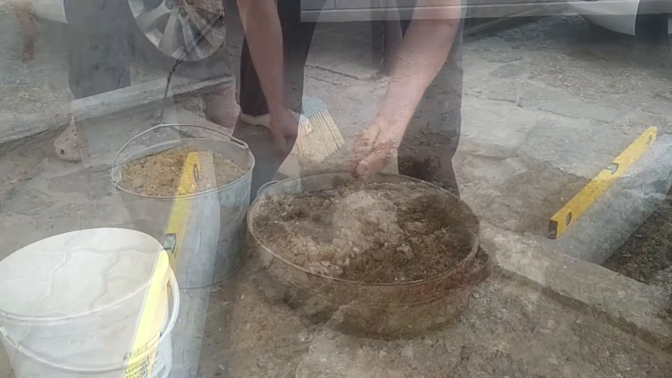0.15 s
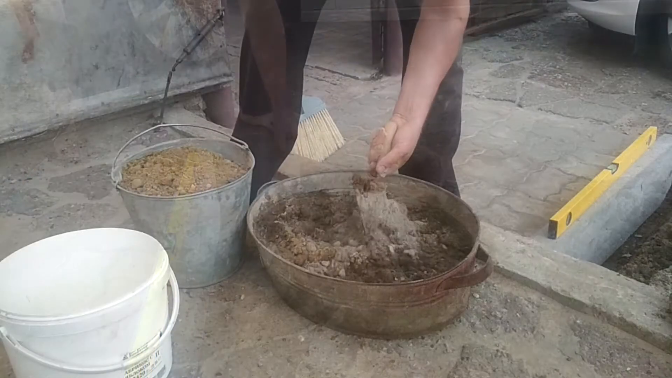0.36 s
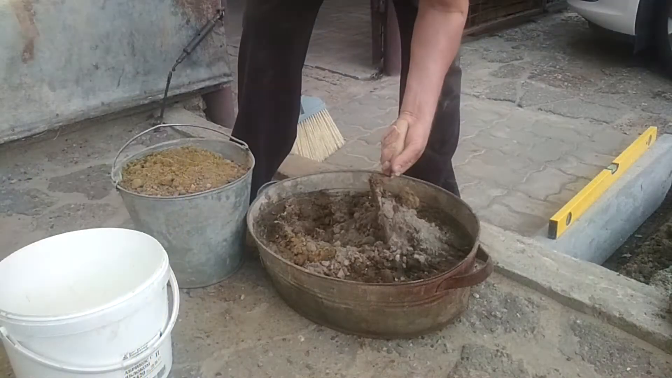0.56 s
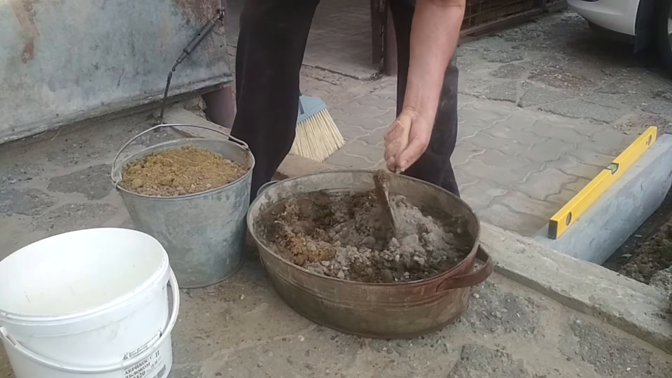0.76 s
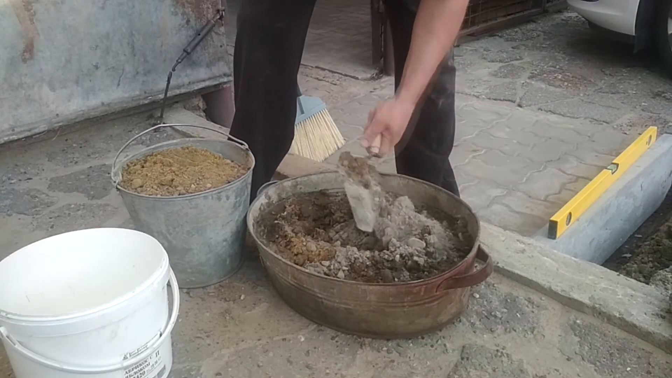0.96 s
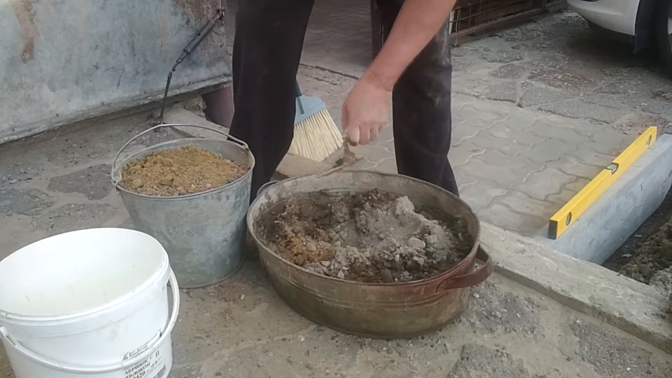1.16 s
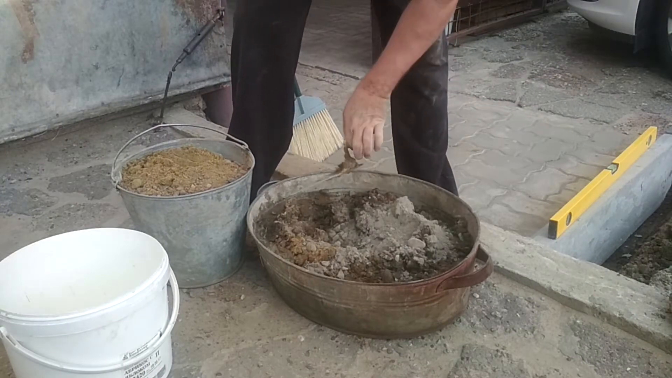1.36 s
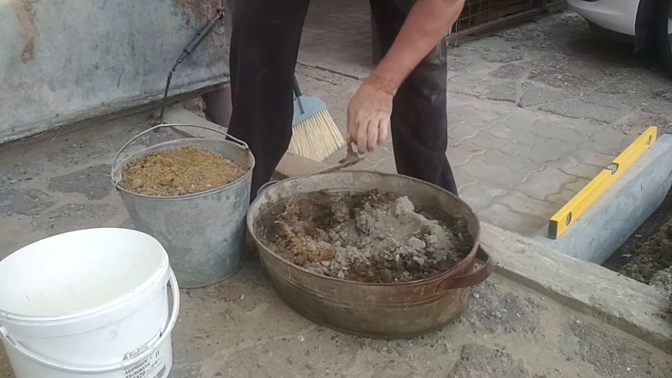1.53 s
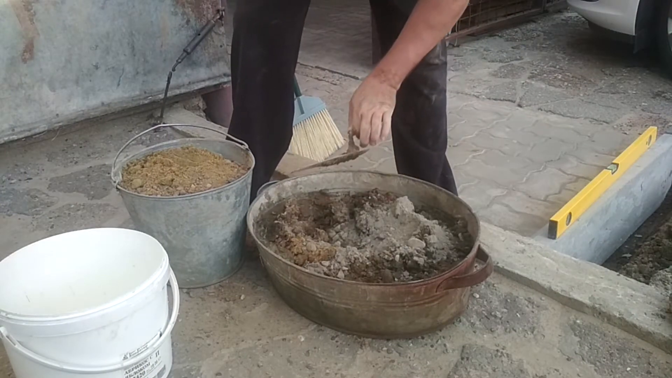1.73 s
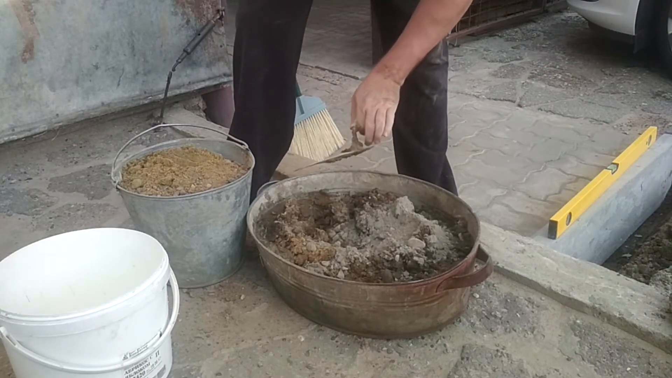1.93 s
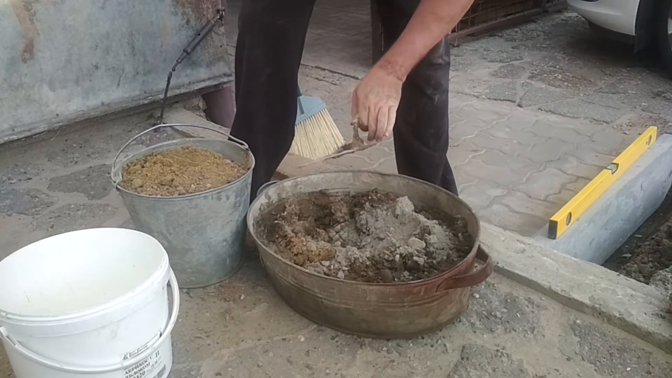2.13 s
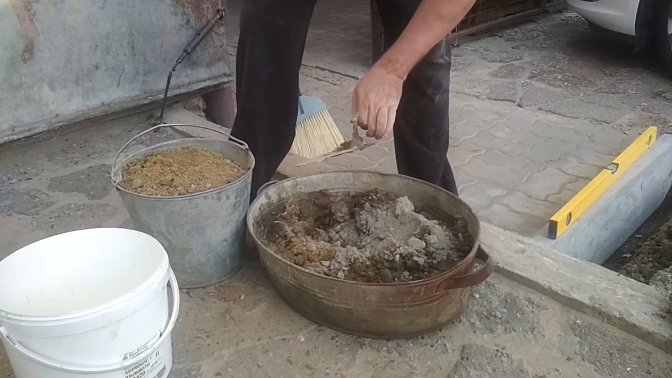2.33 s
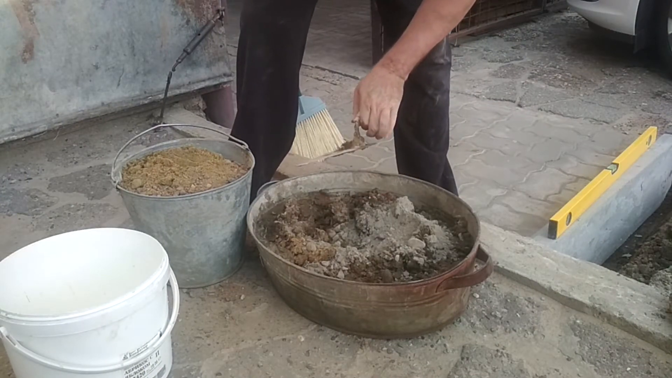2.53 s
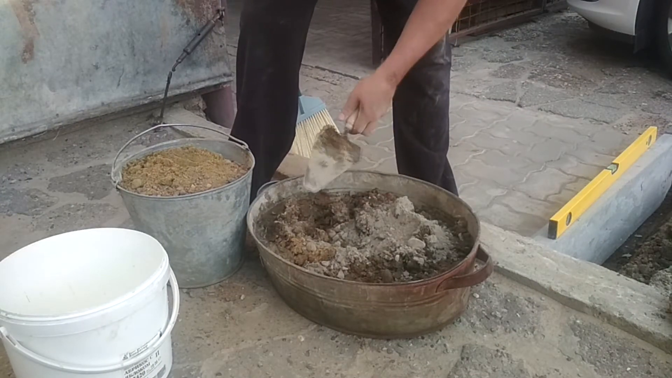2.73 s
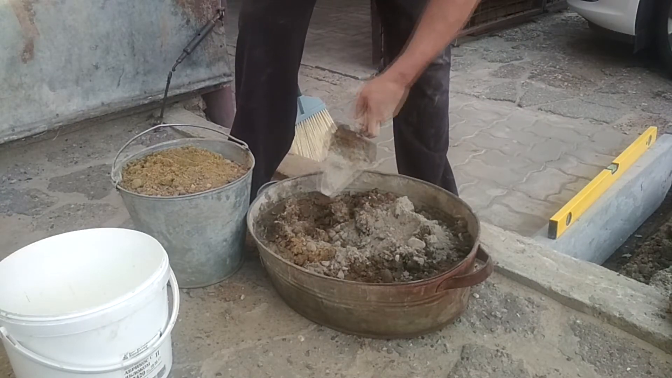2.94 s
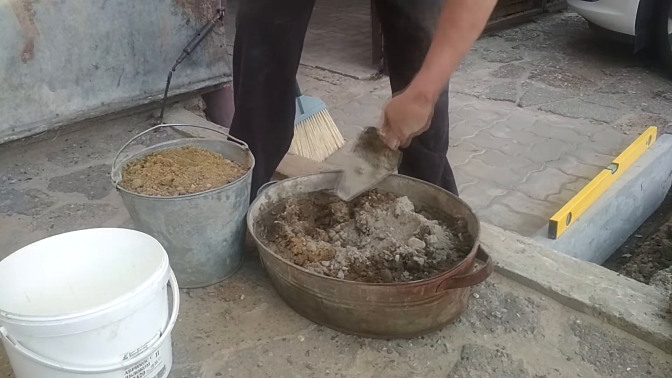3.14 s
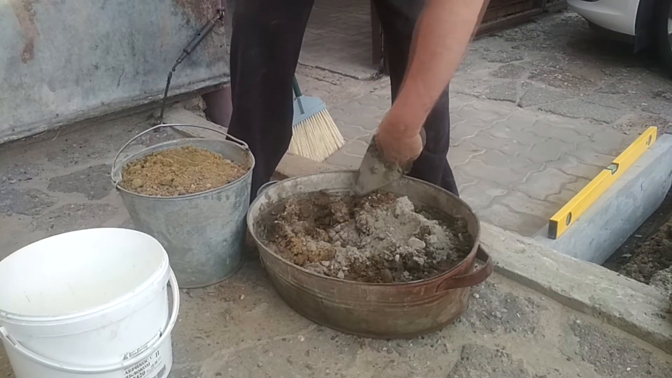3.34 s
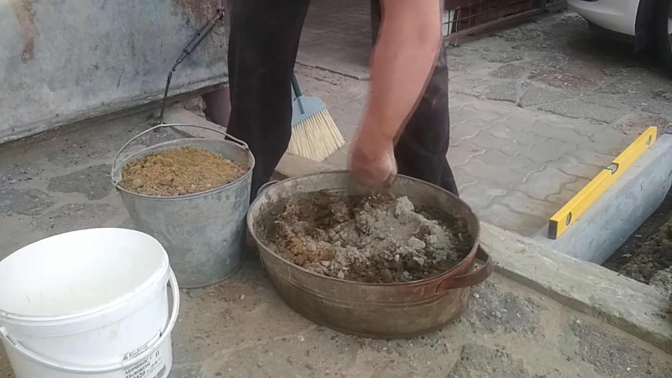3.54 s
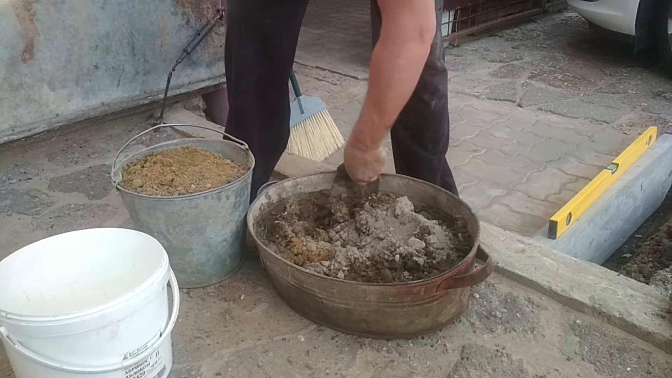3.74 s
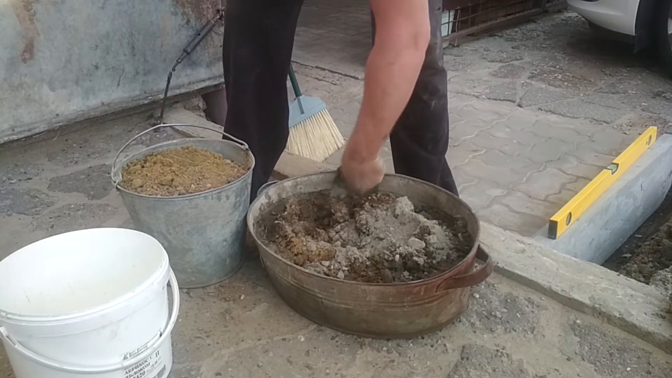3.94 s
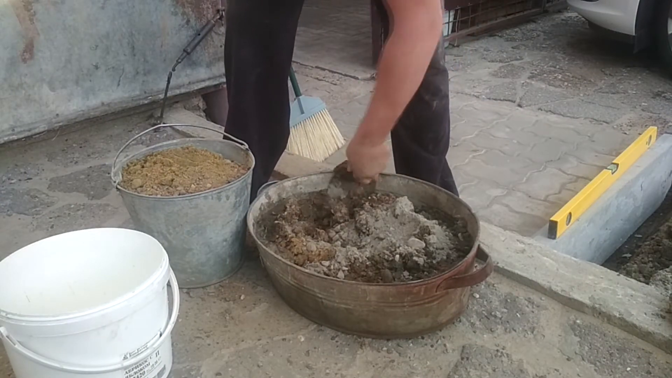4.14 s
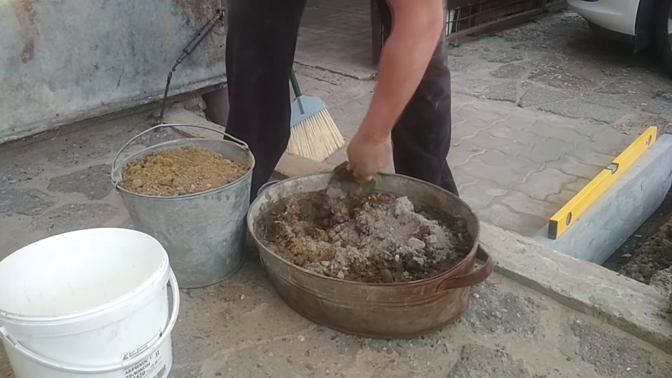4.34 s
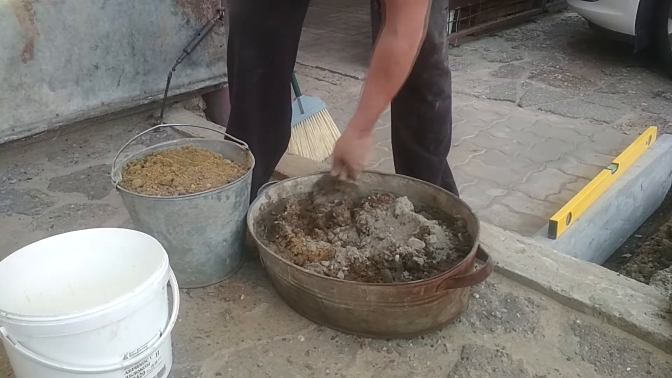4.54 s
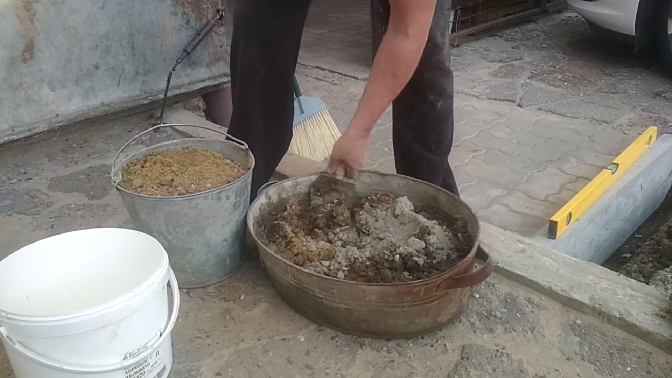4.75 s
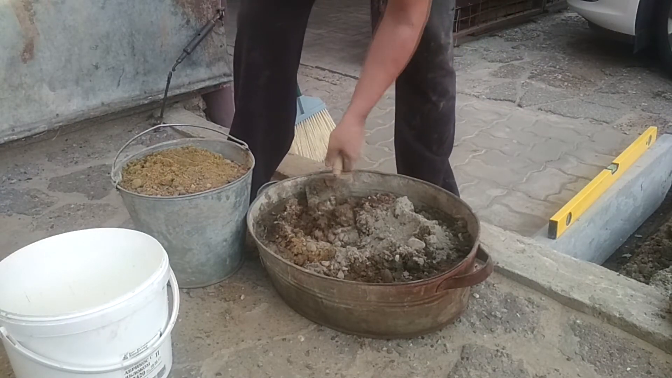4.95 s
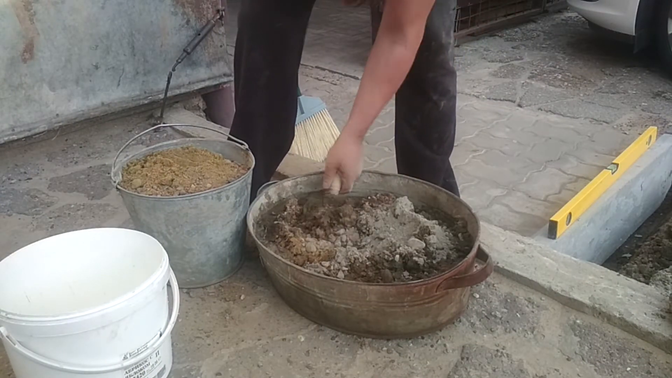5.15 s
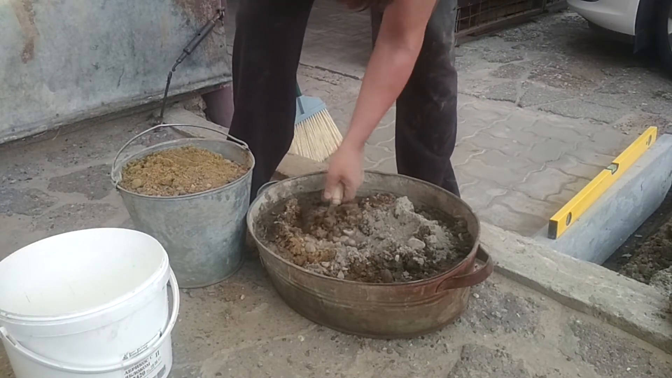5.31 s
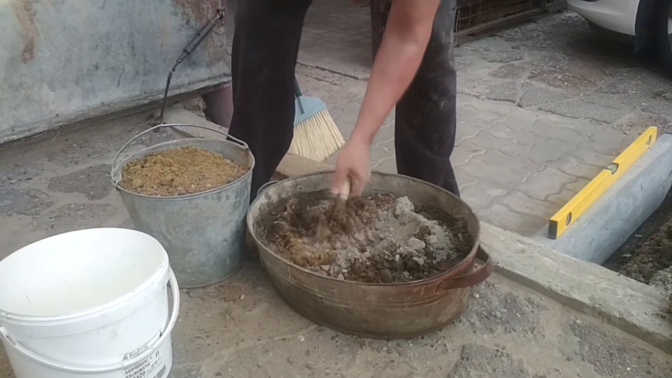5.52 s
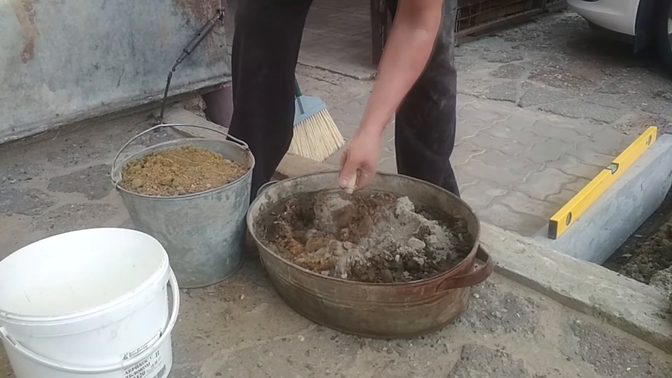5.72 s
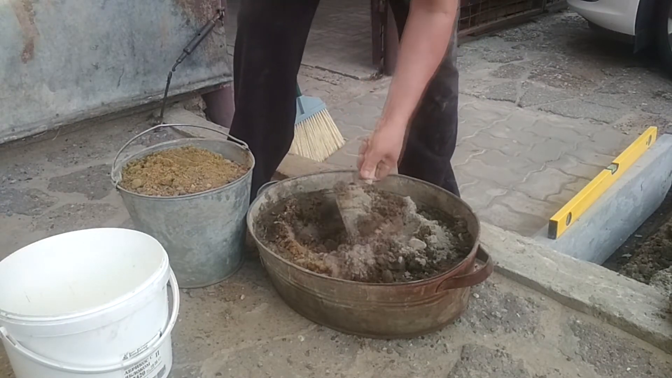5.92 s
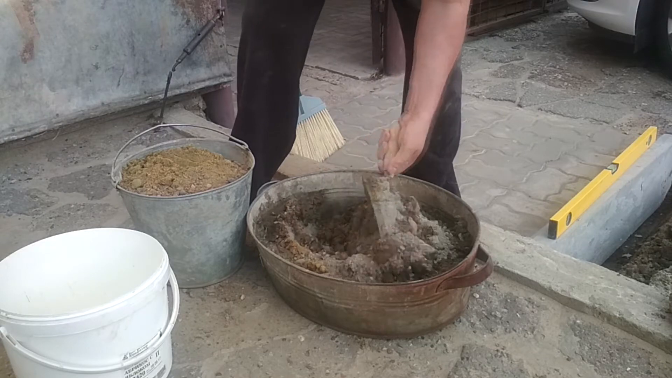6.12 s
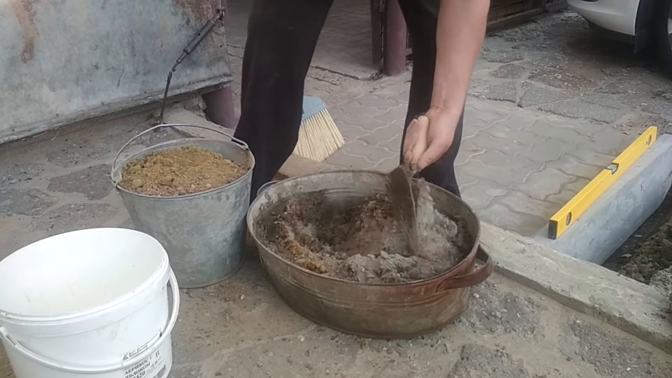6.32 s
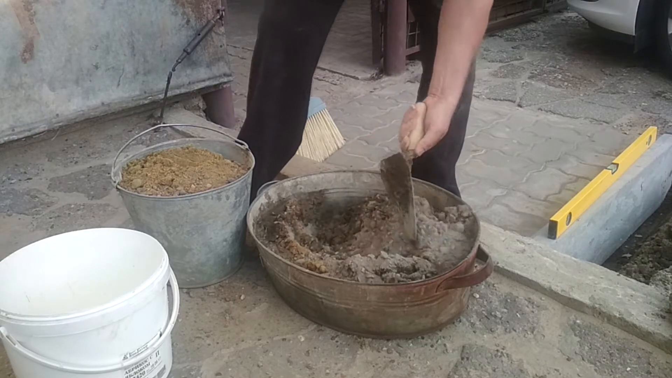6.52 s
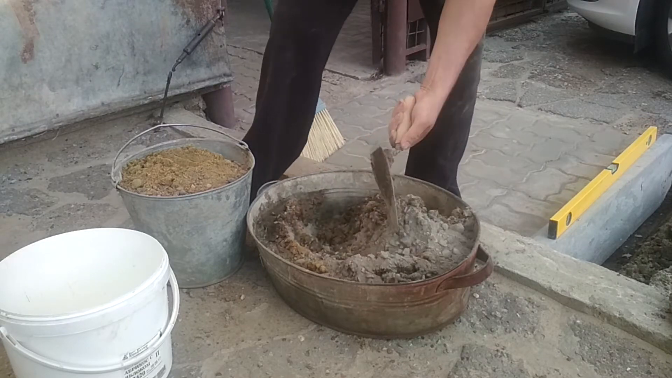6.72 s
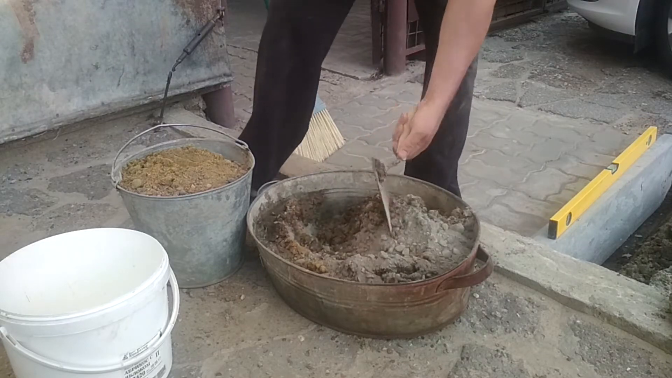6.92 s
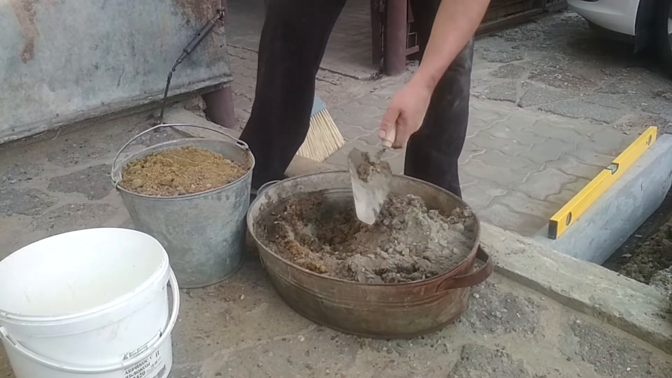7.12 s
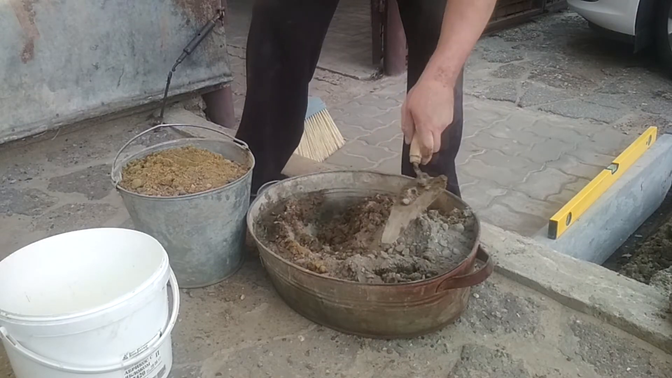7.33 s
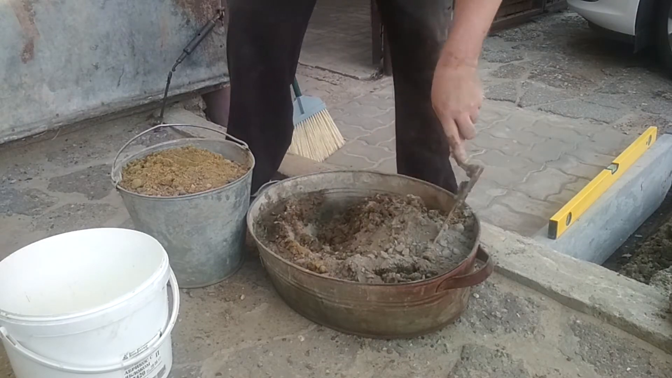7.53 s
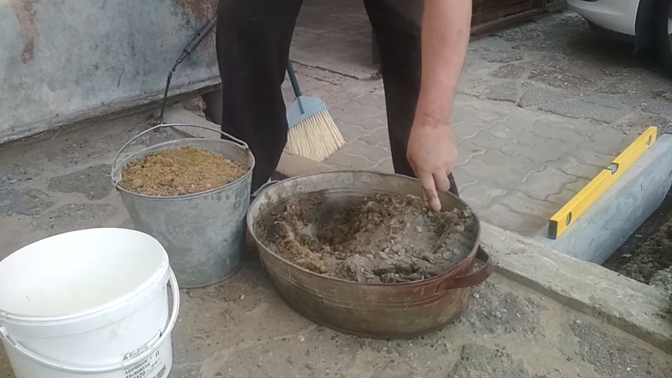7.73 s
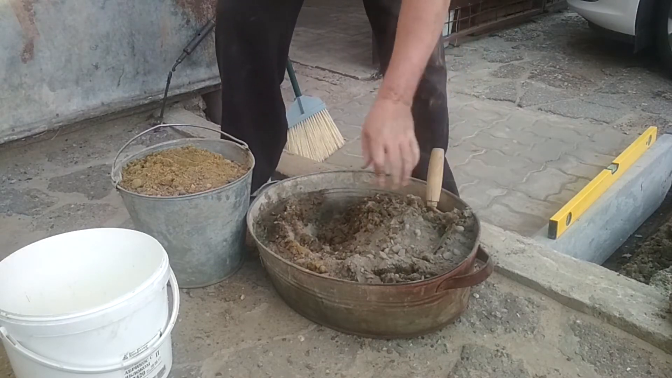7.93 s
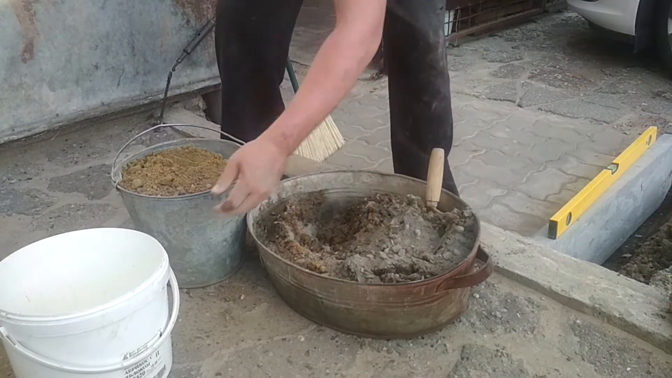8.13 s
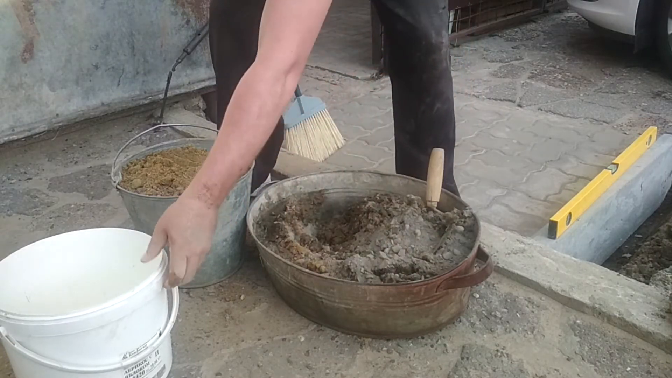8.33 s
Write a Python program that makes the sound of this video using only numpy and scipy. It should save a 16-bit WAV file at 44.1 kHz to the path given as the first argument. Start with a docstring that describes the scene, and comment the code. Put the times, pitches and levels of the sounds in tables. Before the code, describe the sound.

A steel trowel scrapes and slaps gritty wet mortar in a metal basin outdoors while a car idles close by on the right

```python
"""On a paved yard a steel trowel digs, scrapes and slaps gritty mortar in a metal basin: crushed grains
and single shocks, as shaped noise and impulses, excite resonances of basin and blade and bands of grit.
Close by on the right a four-cylinder car idles: injectors ring their rail in sine clusters, the block
knocks once a cycle as resonant noise, and the exhaust hums on multiples of the crank speed.
At the start a hollow thing is set down (damped sines) and wind brushes the microphones (low noise)."""
import sys
import numpy as np
from scipy import signal
from scipy.fft import rfft, irfft, next_fast_len
from scipy.io import wavfile
from scipy.ndimage import uniform_filter1d

SR = 44100
rng = np.random.default_rng(int(sys.argv[2]) if len(sys.argv) > 2 else 0)


def dump(signal):
    """Clip the signal to [-1, 1] and save it as 16-bit WAV at the path in sys.argv[1]."""
    limited = np.clip(np.atleast_2d(signal).T, -1, 1)
    pcm = np.round(limited * 32767).astype(np.int16)
    wavfile.write(sys.argv[1], SR, pcm)


def nominal_scale(level):
    """Amplitude ratio for a level in decibels (scalar or array-like)."""
    x = np.asarray(level, float) / 20
    return 10 ** x


N = 369116
TIME = np.arange(N) / SR  # s
STEPS = np.arange(0, N / SR + .002, .001)  # coarse time axis, s
HZ = np.fft.rfftfreq(next_fast_len(N), 1 / SR)

# Levels in the tables are relative within their source unless stated otherwise.
# Trowel strokes: (start [s], length [s], reference level at the end [dB],
# basin thud re reference [dB], grit re reference [dB])
TROWEL_STROKES = [(0.125, 0.21, -56, 1, 3.5), (0.533, 0.087, -61.5, -5, -3), (0.747, 0.026, -53.5, -6, 3.5),
                  (3.347, 0.1, -47.5, -19, -17), (3.411, 0.02, -32.5, -24, -2.5),
                  (3.471, 0.2, -26, -10, 0.5), (3.479, 0.052, -30.5, -19.5, -0.5),
                  (3.967, 0.025, -52.5, 0, 11), (4.08, 0.037, -41, -3, -0.5), (4.162, 0.051, -41, -2.5, -4),
                  (4.368, 0.058, -45.5, -4, -16), (4.402, 0.052, -43.5, -4, -25), (4.445, 0.1, -28, -1, 1),
                  (4.704, 0.028, -45.5, -2, 9), (4.949, 0.13, -57.5, 28, -22), (5.012, 0.1, -35, 5, 8),
                  (5.263, 0.063, -38.5, 4, 8), (5.442, 0.13, -56.5, 8.5, -44),
                  (6.124, 0.0043, -47.5, 3, -50), (6.38, 0.086, -47, -11.5, 6.5),
                  (6.606, 0.004, -58, -48, 14.5), (6.639, 0.044, -79, 6.5, -13),
                  (6.841, 0.0042, -43, -20.5, 8.5), (7.268, 0.013, -58, -10, -26),
                  (7.39, 0.063, -72, 14, -20), (7.599, 0.1, -35.5, -11.5, 6)]
# Stones and blade edge strike the steel: (time [s], reference level [dB],
# basin thud re reference [dB], grit re reference [dB])
STEEL_STRIKES = [(0.431, -52.5, 13.5, 14), (2.094, -48, -11, 8), (3.277, -45, -35, 19),
                 (3.377, -25.5, -25.5, 7.5), (3.4438, -25.5, -5.5, 13), (3.516, -28, -5, -5),
                 (3.548, -39, -28, 0), (3.579, -25, 0.5, -1), (3.592, -22, -11, 12), (3.603, -30, -11, -5),
                 (3.635, -22, 3, -19), (3.6416, -28, -2, -15), (3.648, -19, 2, -15), (3.6674, -13, -9, -25),
                 (3.685, -28.5, -5, 20), (3.969, -47, -53, 2), (4.084, -43, -35, 25),
                 (4.1086, -15.5, -5.5, 6.5), (4.159, -18.5, -6.5, 13), (4.1807, -21, -1.5, 5),
                 (4.212, -39.5, -20, 26), (4.412, -35.5, -18, -14), (4.421, -38.5, -22, 23),
                 (4.4485, -46, -15, 31), (4.4638, -39.5, 17, 31), (4.482, -16.5, -39.5, 12),
                 (4.501, -21.5, -8, 5), (4.52, -14, -3, 0), (4.526, -27, -10, -9), (4.537, -18.5, 4.5, -16),
                 (4.568, -13.5, -3, 3), (4.574, -23, -1, 1), (4.746, -29.5, -37, 13.5),
                 (5.007, -35, -5, 11.5), (5.031, -25.5, 4, -4), (5.053, -29, 8, -3), (5.058, -29, 8, -5),
                 (5.08, -14.5, 0.5, -11.5), (5.0987, -18.5, 3, -13), (5.105, -27, 2.5, -8.5),
                 (5.268, -44.5, 9, 17.5), (5.336, -24, -2.5, 1), (6.1297, -26.5, -65, -40),
                 (6.1787, -40, -38, -22.5), (6.3847, -25.5, -27, 9.5), (6.444, -22.5, -30, 1),
                 (6.472, -26.5, -14, 6.5), (6.5105, -15, -35, -12), (6.519, -27, -11, 1),
                 (6.609, -40, -35, 15), (6.6124, -28, -42, 13.5), (6.619, -39, -37, 17.5),
                 (6.834, -32.5, -19, 17), (7.5809, -35, -24, -8), (7.618, -36, -34, 12),
                 (7.719, -37.5, 12, -10)]
# Loose sand slides off the blade: (start [s], length [s], level [dB])
SAND_TRICKLES = [(5.483, 0.096, -38.5), (5.626, 0.037, -42), (5.665, 0.031, -42), (5.863, 0.028, -45)]
# Basin resonances: (frequency [Hz], width of each of two cascaded resonators [Hz], level [dB])
BASIN_MODES = [(193, 74, -18.5), (262.4, 106, -7.5), (467, 198, -2), (548, 109, 2), (769, 151, 2.5),
               (977, 170, -1)]
# Blade resonances, the lowest first: (frequency [Hz], width of each of two cascaded resonators [Hz], level [dB])
BLADE_MODES = [(1144, 370, 7), (1405, 180, 12.5), (1763, 308, 13.5), (2032, 340, 3), (2714, 567, 3.5)]
# Spectrum of the broad rasp: (frequency [Hz], level per Hz [dB])
RASP_SPECTRUM = [(1650, -72), (2800, -66), (3090, -0.5), (4040, 3.5), (4980, 2), (7150, -0.5), (9000, -0.5),
                 (11700, -41), (19800, -120)]
# Spectrum of the crushed grit: (frequency [Hz], level per Hz [dB])
GRIT_SPECTRUM = [(7000, -24), (8800, -7), (10000, 4), (11500, 10), (13800, 7.5), (15800, 3), (16500, -57)]
# Left-right correlation of (basin [1], low blade [1], high blade [1], rasp [1], grit [1])
PART_ALIKE = 0.84, 0.57, 0.47, 0.21, 0.077
# Gain from start to end of a stroke: (basin [dB], low blade [dB], high blade [dB], rasp [dB], grit [dB])
STROKE_SWELL = 28.3, 15.4, 13.8, 11.6, 10.6
# First touch of a strike, one clean shock: (basin [dB], low blade [dB], high blade [dB], rasp [dB], grit [dB])
STRIKE_CLICK = 23.4, 22.8, 22.43, 15, 8
# The scuff that follows it: (basin [dB], low blade [dB], high blade [dB], rasp [dB], grit [dB])
STRIKE_RUB = -8, -0.5, -0.5, 0.5, 0.5
# Level difference between the microphones at the basin: (frequency [Hz], left minus right [dB])
BASIN_BALANCE = [(60, 9.5), (110, 3), (200, 0), (380, 2), (700, -2), (1290, 1), (2380, -2), (4400, -2.5),
                 (8120, -12), (15000, -2.5)]
# The idle hunts a little; moments at which an engine cycle begins: (time [s])
CYCLE_STARTS = [0.1553, 0.701, 1.2428, 1.608, 2.7002, 3.426, 3.7917, 4.3345, 4.8783, 6.3391, 6.702, 7.0641,
                8.3354]
# Each injector: (closing tick lag [s], closing tick re opening [dB], loose rattle [dB])
INJECTOR_TICKS = [(0.021, -16, -26), (0.012, -12, -31), (0.005, 2, -28), (0.01, -9.5, -24.5)]
# Rings of the fuel rail: (frequency [Hz], left minus right [dB],
# level when struck by injector 1 [dB], 2 [dB], 3 [dB], 4 [dB])
RAIL_RINGS = [(9070, -18.5, -47, -45, -15, -29), (9870, -21, -8, -33, -14.5, -14),
              (9740, -23, -39, -20, -15, -35), (10530, -27, -31, 5.5, -28, -20),
              (10820, -21, -3, -25, -2, -16.5), (11150, -28, 9.5, -7, -23, -30),
              (11630, -27, 8.5, -18, -24, -0.5), (12700, -22.5, -12, -11, -24, 1),
              (11960, -14, -15.5, -8.5, -1.5, 6), (12170, -11.5, 13, 6, -21, 2.5),
              (12900, -14, 14.5, 9, -4, 14), (13400, -7, 1, -9, -21, -20),
              (13400, 15, -4.5, -18, -25.5, -6), (13920, 7, -10, -3.5, -24.5, -7.5)]
# Rings of the block: (place in the cycle [0-1], frequency [Hz], level [dB], resonator width [Hz])
BLOCK_KNOCKS = [(0.21, 1034, -56.5, 58), (0.2, 1340, -62.5, 250), (0.87, 1310, -62, 530),
                (0.34, 1930, -65.5, 510), (0.98, 449, -75.5, 100)]
# Engine-bay resonances: (frequency [Hz], resonator width [Hz], rms level once settled [dB])
BAY_MODES = [(262, 40, -76), (492, 70, -76), (838, 120, -75.5), (1013, 32, -77), (1365, 110, -79),
             (1926, 90, -78), (2352, 110, -77)]
# Exhaust hum: (multiple of crank speed [1], level [dB])
EXHAUST_ORDERS = [(2, -58.5), (3, -80), (4, -79), (5, -94.5), (6, -64), (7, -83), (8, -68.5), (9, -75),
                  (11, -67)]
# Rings of the hollow thing: (frequency [Hz], level [dB], 60 dB decay time [s], swell time [s])
HOLLOW_RINGS = [(290, -8, 0.1, 0.0022), (508, 4.5, 0.013, .001), (676, 6, 0.11, 0.0098),
                (1260, -26, 0.032, 0.0011)]
# Puffs of wind: (time of the peak [s], level [dB])
WIND_PUFFS = [(0.0, -42.5), (0.198, -44.5), (0.433, -49)]
# Spectrum of the yard: (frequency [Hz], level per Hz [dB])
YARD_SPECTRUM = [(35, -10.5), (60, -2), (130, -3.5), (330, -14), (924, -18), (1010, -30), (1410, -15),
                 (1780, -25.5), (2090, -18), (2710, -27), (8920, -32), (12700, -14), (16000, -32)]

BITE_DB_PER_S = 906  # how fast a stroke sets in
# the blade lifts off; the mortar settles after it
LIFT_DB_PER_S, SLUMP_DB, SLUMP_DB_PER_S = 499, -8.5, 183
# dry, gritty strokes rasp; buried ones do not
STROKE_RASP_DB, RASP_PER_GRIT, RASP_PER_THUD = -13, 0.65, -0.38
STRIKE_RASP_DB, STRIKE_DB = -6.5, -12.0  # rasp re reference; trim of all strikes
STRIKE_RISE_S, STRIKE_T60_S = 0.00079, 0.035
CRACK_DB, CRACK_T60_S = 2.5, 0.0023  # the first instant of a strike
# wet mortar deadens part of the basin to a short smack
SMACK_DB, SMACK_HZ, SMACK_WIDTH_HZ = 7, 850, 600
CYCLE_S = .182  # nominal engine cycle
INJECTOR_DB, INJECTOR_DRIFT_DB = -41.5, .8
RAIL_RISE_S, RAIL_T60_S, RAIL_TAIL_DB, RAIL_TAIL_T60_S = 0.0043, 0.03, -22, 0.17
RING_SCATTER_DB = 3  # spread of each rail ring from tick to tick
# each ring is a cluster that trembles in level and warbles in phase
TREMBLE_DB, WARBLE_RAD = 3.5, 1.2
LEFT_LAG = 15  # samples by which the injectors reach the left microphone later
BAY_DB, BAY_FADE_S = 6.5, 1.84  # engine-bay noise starts fuller and settles
HOLLOW_S, HOLLOW_DB = .1243, -18.5
WIND_RISE_DB_PER_S, WIND_FADE_DB_PER_S = 898.5, 125
YARD_DB = -64.5  # rms


def trowel():
    """Source and resonator: crushed grains and single strikes excite the modes of basin and blade."""
    slips = walk(130)
    grains = nominal_scale(2.53 * rng.exponential(size=N))
    chance = rng.standard_normal((2, N))
    out = 0
    for k, paths in enumerate(resonant_parts()):
        blows, clicks = strikes(k)
        press = stroke_pressure(k)
        scale = np.sqrt(np.mean(np.abs(sum(paths)) ** 2))
        # lumps of mortar excite each ring of the steel at their own moments
        lump_db = 2.5 if k < 3 else 3.6
        sound = 0
        for path in paths:
            crush = unit(grains * nominal_scale(1.5 * slips + lump_db * walk(70)))
            force = (press * crush + blows) * chance
            force[0] += clicks
            sound = sound + through(force, path / scale)
        out = out + pair(sound[0], sound[1], PART_ALIKE[k])
        if k == 0:
            out = out + nominal_scale(SMACK_DB) * through(clicks, ring(SMACK_HZ, SMACK_WIDTH_HZ))
    # the basin stands a touch nearer the right microphone
    side = np.sqrt(colour(BASIN_BALANCE))
    return through(np.array([np.roll(out[0], 2), out[1]]), np.array([side, 1 / side]))


def resonant_parts():
    """Transfer functions of basin, low blade, high blade, rasp and grit, each a list of parallel paths."""
    modes = BASIN_MODES, BLADE_MODES[:1], BLADE_MODES[1:]
    steel = [[nominal_scale(db) * ring(hz, width) ** 2 for hz, width, db in m] for m in modes]
    rasp_low, rasp_high = halves(colour(RASP_SPECTRUM), 4800)
    rasp = [*halves(rasp_low, 4300), *halves(rasp_high, 7000)]
    return [*steel, rasp, halves(colour(GRIT_SPECTRUM), 13800)]


def stroke_pressure(k):
    """Powers of unrelated pushes add: amplitude of all strokes on part k of resonant_parts()."""
    power = 0
    if k == 4:  # trickling sand sounds in the grit alone
        power = sum(push(start, length, db, 0) for start, length, db in SAND_TRICKLES)
    for start, length, db, thud_db, grit_db in TROWEL_STROKES:
        rasp_db = STROKE_RASP_DB + RASP_PER_GRIT * grit_db + RASP_PER_THUD * thud_db
        part_db = (thud_db, *loading(thud_db), rasp_db, grit_db)[k]
        power = power + push(start, length, db + part_db, STROKE_SWELL[k])
    return np.interp(TIME, STEPS, np.sqrt(power))


def push(start, length, db, swell_db):
    """Power of one push of the blade: quick bite, swell, lift-off and the slump that follows."""
    t = STEPS - start
    after = np.maximum(t - length, 0)
    bite_db = BITE_DB_PER_S * np.minimum(t, 0)
    progress = np.clip(t / max(length, .005), 0, 1)
    rise = nominal_scale(db + bite_db - swell_db * (1 - progress) ** 2)
    lift = nominal_scale(-LIFT_DB_PER_S * after)
    slump = nominal_scale(SLUMP_DB - SLUMP_DB_PER_S * after)
    return rise ** 2 * (lift ** 2 + slump ** 2)


def strikes(k):
    """An impact is an impulse followed by decaying friction: scuff envelopes and clicks on part k."""
    t = TIME[:6000]
    decay = nominal_scale(-60 * t / STRIKE_T60_S) + nominal_scale(CRACK_DB - 60 * t / CRACK_T60_S)
    blow = np.minimum(t / STRIKE_RISE_S, 1) * decay
    blows, clicks = np.zeros((2, N))
    for s, db, thud_db, grit_db in STEEL_STRIKES:
        i = int(s * SR)
        part_db = (thud_db, *loading(thud_db), STRIKE_RASP_DB, grit_db)[k]
        size = nominal_scale(db + part_db + STRIKE_DB)
        blows[i:i + len(t)] += size * nominal_scale(STRIKE_RUB[k]) * blow
        clicks[i + 20] += size * nominal_scale(STRIKE_CLICK[k])
    return blows, clicks


def loading(thud_db):
    """Mass loading: a blade buried in mortar thuds more and rings lower; dB of its low and high rings."""
    shift = np.clip(0.17 * (thud_db + 7.0), -9, 6)
    buried_db = max(thud_db - 5, 0)  # the heaviest thuds carry the low ring up with them
    return shift - 3 + buried_db, -shift - 3


def injectors():
    """Forced and free vibration: each opening and closing rings the rail nearly alike every cycle."""
    t = TIME[:5000]
    decay = nominal_scale(-60 * t / RAIL_T60_S) + nominal_scale(RAIL_TAIL_DB - 60 * t / RAIL_TAIL_T60_S)
    fade = np.minimum(t / RAIL_RISE_S, 1) ** 2 * decay
    drift_db = INJECTOR_DB + INJECTOR_DRIFT_DB * walk(2.236)
    rail = np.array(RAIL_RINGS)
    hz, levels_db = rail[:, :1], rail[:, 2:]
    sides = nominal_scale([rail[:, 1], 0 * rail[:, 1]])
    out, rattle = np.zeros((2, N + 3 * len(t))), 0  # margins hold ticks that cross either end
    for k, (lag, close_db, loose_db) in enumerate(INJECTOR_TICKS):
        s = cycle_times(k / 4)
        size = nominal_scale(np.interp(s, TIME, drift_db) + 1.5 * rng.standard_normal(len(s)))
        opening, closing = (s - .003, size), (s + lag, size * nominal_scale(close_db))
        for at, gain in (opening, closing):
            tremble, warble = (walk(250)[:hz.size * t.size].reshape(hz.size, -1) for _ in range(2))
            phase = WARBLE_RAD * warble + rng.uniform(0, 2 * np.pi, hz.shape)
            rings = fade * nominal_scale(TREMBLE_DB * tremble) * np.sin(2 * np.pi * hz * t + phase)
            scatter_db = RING_SCATTER_DB * rng.standard_normal((len(s), len(hz)))
            mix = gain[:, None] * nominal_scale(levels_db[:, k] + scatter_db)
            for i, m in zip((at * SR).astype(int) + len(t), mix):
                if 0 <= i < N + len(t):
                    out[:, i:i + len(t)] += (sides * m) @ rings
            rattle = rattle + nominal_scale(loose_db + 24.5) * signal.fftconvolve(spikes(at, gain), fade)[:N]
    a, b = rattle * rng.standard_normal((2, N))
    bands = np.array([nominal_scale(-19) * plateau(13100, 2000), plateau(12000, 4400)])
    out = out[:, len(t):len(t) + N] + through(np.array([a + b, b]), bands)
    return np.array([np.roll(out[0], LEFT_LAG), out[1]])


def block():
    """Resonance under short noisy shoves: uneven rings of the engine block at set places in the cycle."""
    out, t = 0, TIME[:4000]
    shove = np.minimum(t / 0.0062, 1) * nominal_scale(-60 * t / 0.19)
    for place, hz, db, width in BLOCK_KNOCKS:
        s = cycle_times(place)
        late, uneven = rng.standard_normal((2, len(s)))
        blows = spikes(s + 0.0177 * late, nominal_scale(db + 1.5 * uneven))
        noise = signal.fftconvolve(blows, shove)[:N] * rng.standard_normal((2, N))
        a, b = through(noise, ring(hz, width) ** 2)
        out = out + pair(a, b, 0.044) * np.sqrt(SR / width)
    return out * nominal_scale(np.array([[-1.5], [1.5]]))


def murmur():
    """Resonant filtering: narrow bands of engine-bay noise that swell and fade each on their own."""
    out = 0
    for hz, width, db in BAY_MODES:
        noise = nominal_scale(4.45 * walk(14)) * rng.standard_normal((2, N))
        a, b = through(noise, ring(hz, width) ** 2)
        out = out + nominal_scale(db) * pair(unit(a), unit(b), 0.14)
    return out


def exhaust():
    """Harmonic series on the crank speed, each partial wavering; stronger at the right microphone."""
    s, count = cycles()
    crank = 4 * np.pi * np.interp(TIME, s, count)  # two turns per cycle
    hum = 0
    for k, db in EXHAUST_ORDERS:
        phase = rng.uniform(0, 2 * np.pi) + 0.54 * walk(1.804)
        hum = hum + nominal_scale(db + 1.0 * walk(5)) * np.sin(k * crank + phase)
    return hum * nominal_scale(np.array([[-2], [5]]))


def cycles():
    """Periodic motion: times and running numbers of the listed cycles, carried on past both ends."""
    s = np.r_[CYCLE_STARTS[0] - CYCLE_S, CYCLE_STARTS, CYCLE_STARTS[-1] + CYCLE_S]
    return s, np.cumsum(np.round(np.diff(s, prepend=s[0]) / CYCLE_S))


def cycle_times(place):
    """Phase to time: moments at which the engine passes a place in its cycle."""
    s, count = cycles()
    return np.interp(np.arange(count[-1]) + place, count, s)


def hollow():
    """Free decay: one knock on a hollow vessel sounds its damped modes."""
    t = np.maximum(TIME - HOLLOW_S, 0)
    rings = 0
    for hz, db, t60, swell in HOLLOW_RINGS:
        envelope = nominal_scale(db - 60 * t / t60) * np.minimum(t / swell, 1)
        rings = rings + envelope * np.sin(2 * np.pi * hz * t)
    return -nominal_scale(HOLLOW_DB) * rings * nominal_scale(np.array([[-.4], [.4]]))


def wind():
    """Turbulent pressure: low noise flutters on the microphones in puffs and dies away."""
    puffs = 0
    for s, db in WIND_PUFFS:
        slope_db = np.minimum(WIND_RISE_DB_PER_S * (TIME - s), WIND_FADE_DB_PER_S * (s - TIME))
        puffs = puffs + nominal_scale(db + slope_db)
    a, b = through(rng.standard_normal((2, N)), ring(28, 67) * ring(84, 183.0))
    return puffs * pair(unit(a), unit(b), 0.95)


def yard():
    """Diffuse field: distant hiss and rumble, alike left and right only in the bass."""
    mid, side = rng.standard_normal((2, N)) * nominal_scale(0.5 * walk(4.46))
    gain = colour(YARD_SPECTRUM)
    share = np.clip(HZ / 2500, .15, 1)
    spread = through(side, gain * share) * np.array([[1], [-1]])
    return nominal_scale(YARD_DB) * unit(through(mid, gain) + spread)


def yard_echo(work):
    """Reverberation: walls around the yard send back a short diffuse tail."""
    t = TIME[:12000]
    walls = rng.standard_normal((2, len(t))) * nominal_scale(-60 * t / 0.29) * (t > .006)
    return nominal_scale(-39.5) * signal.fftconvolve(work, walls, axes=1)[:, :N]


def unit(x):
    """Normalisation to rms 1."""
    return x / np.sqrt(np.mean(x ** 2))


def through(x, gain):
    """Linear filtering: the spectrum is multiplied by a gain per frequency."""
    return irfft(rfft(x, next_fast_len(N)) * gain, next_fast_len(N))[..., :N]


def colour(points):
    """Spectral envelope: gain through (Hz, dB) points on a log-frequency axis."""
    hz, db = np.transpose(points)
    return nominal_scale(np.interp(np.log(HZ + 1), np.log(hz), db))


def halves(gain, hz):
    """Crossover: a gain split into its parts below and above hz."""
    below = 1 / (1 + (HZ / hz) ** 8)
    return gain * below, gain * (1 - below)


def ring(hz, width):
    """Damped oscillator: causal resonance, gain 1 at its centre."""
    return 1j * HZ * width / (hz ** 2 - HZ ** 2 + 1j * HZ * width)


def plateau(hz, width):
    """Modal overlap: flat-topped band of many close rings."""
    return 1 / np.sqrt(1 + ((HZ - hz) / (width / 2)) ** 6)


def pair(a, b, alike):
    """Partial correlation: left and right from two unrelated signals."""
    alike = np.clip(alike, 0, 1)
    return np.sqrt((1 + alike) / 2) * a + np.sqrt((1 - alike) / 2) * b * np.array([[1], [-1]])


def walk(rate):
    """Slow modulation: random levels, one every 1 / rate s, joined by slopes; spread near 1."""
    k = int(SR / rate)
    held = np.repeat(rng.standard_normal(N // k + 1), k)
    return 1.625 * uniform_filter1d(held, k)[:N]


def spikes(s, size):
    """Impulse train: single impulses at times s."""
    i = np.round(s * SR).astype(int)
    keep = (i >= 0) & (i < N)
    return np.bincount(i[keep], (size * np.ones(len(s)))[keep], N)


def scene():
    """Superposition of the work at the basin with its echo, the idling car, the yard and the wind."""
    work = trowel()
    bay = nominal_scale(BAY_DB * np.exp(-(TIME / BAY_FADE_S) ** 2))
    car = injectors() + bay * (block() + murmur()) + exhaust()
    return work + yard_echo(work) + car + hollow() + wind() + yard()


def roll_off(x):
    """The treble ends steeply here."""
    return signal.sosfilt(signal.butter(12, 16980, fs=SR, output="sos"), x)


def record(dry):
    """Band limiting: a steep low-pass filter cuts the top above 16.3 kHz."""
    top = signal.ellip(8, .2, 70, 16300, fs=SR, output="sos")
    mix = signal.sosfilt(top, dry)
    return roll_off(mix)


dry = scene()
out = record(dry)
dump(out)
```